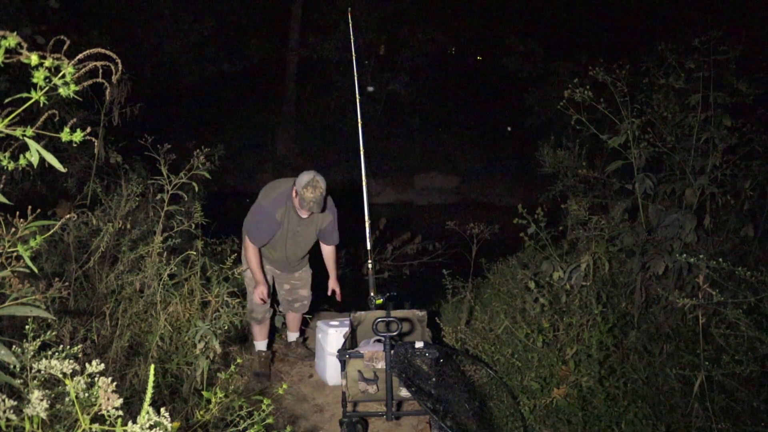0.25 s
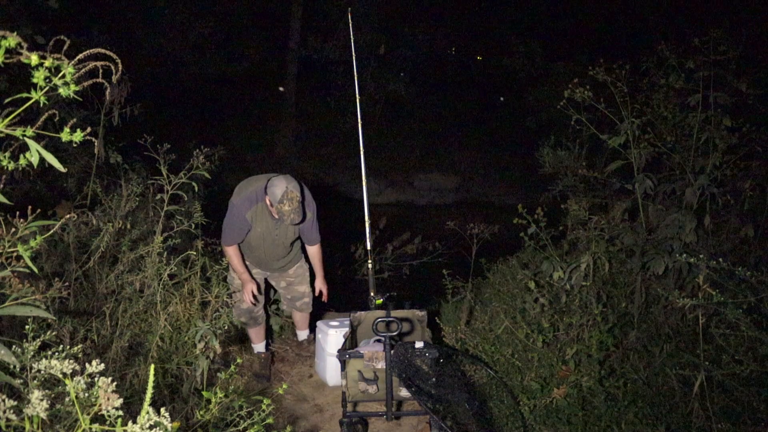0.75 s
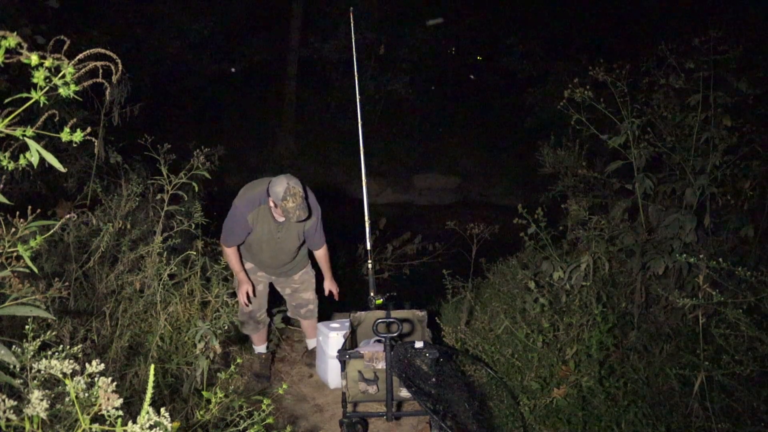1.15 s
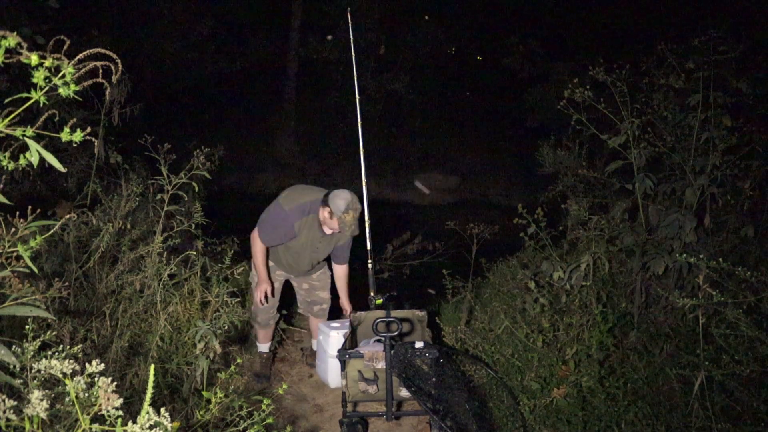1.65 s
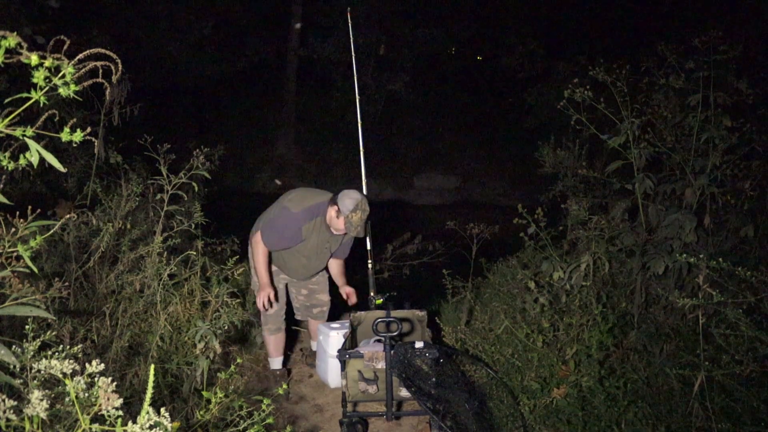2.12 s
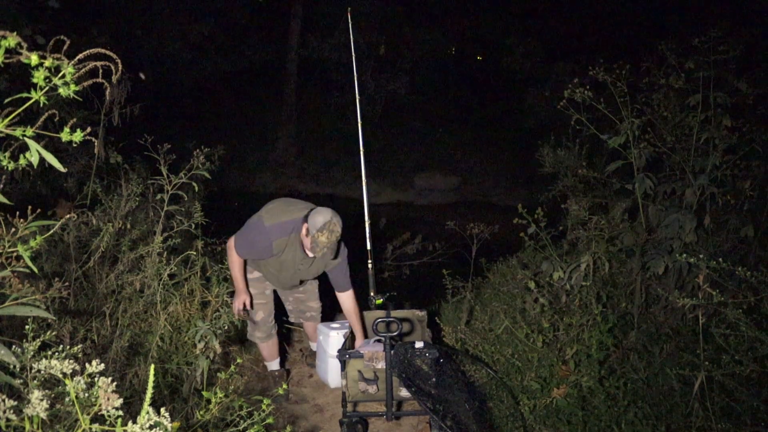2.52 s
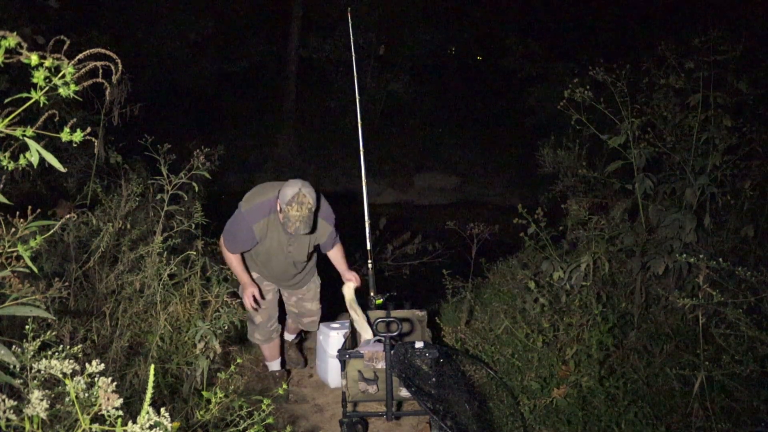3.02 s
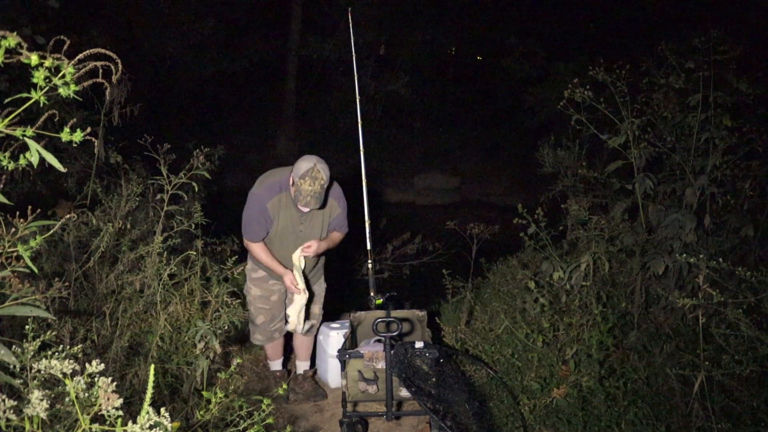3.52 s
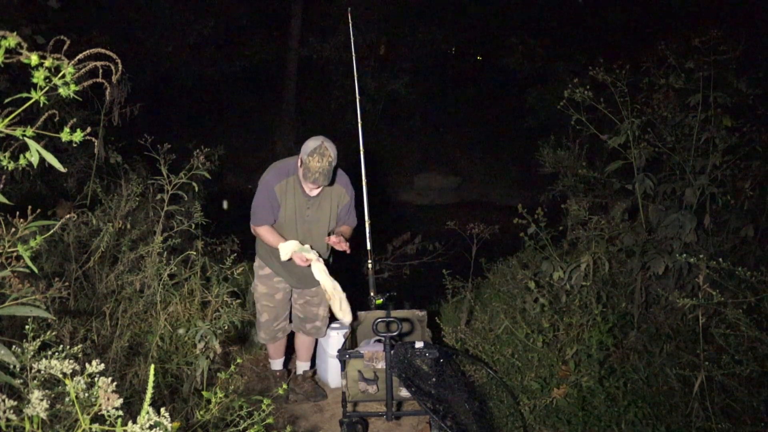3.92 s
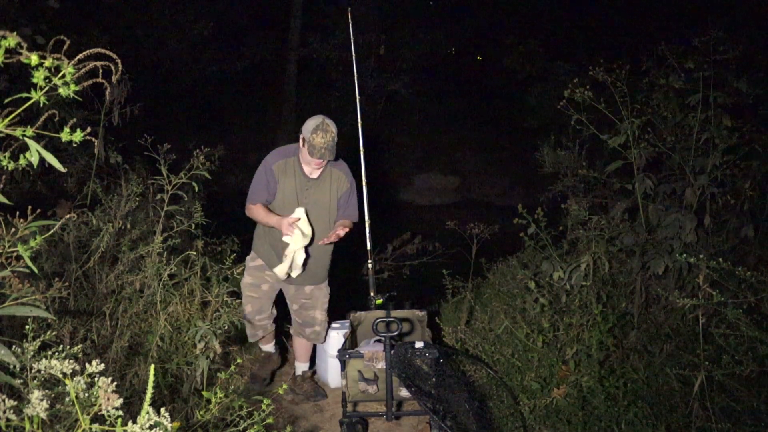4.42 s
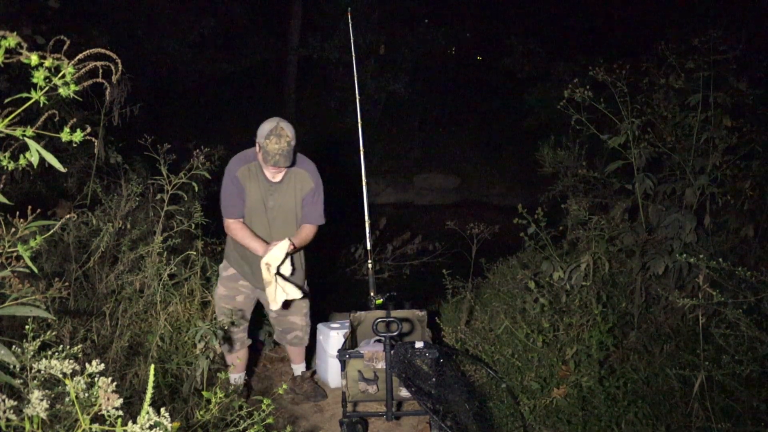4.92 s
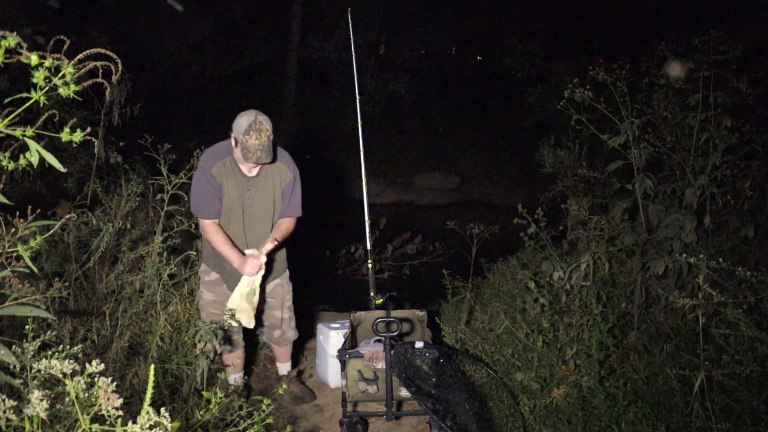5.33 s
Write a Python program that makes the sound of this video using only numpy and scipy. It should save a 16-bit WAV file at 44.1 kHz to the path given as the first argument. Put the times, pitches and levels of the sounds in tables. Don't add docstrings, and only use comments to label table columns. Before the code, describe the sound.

Outdoors at night beside quiet water, continuous high cricket trilling mixes with dry buzzing and rasping katydids that grow stronger towards the end. In the first two seconds a loaded plastic bucket is bumped, giving short, dull, low rings and a bright wire tick. Then come faint taps and rag scrapes, with a small cluster near the end. A single microphone hears it in mono, the handling loudest and the insects fairly quiet.

```python
import sys
import numpy as np
from scipy import signal
from scipy.fft import rfft, irfft
from scipy.io import wavfile
from scipy.ndimage import uniform_filter1d

SR = 44100
rng = np.random.default_rng(int(sys.argv[2]) if len(sys.argv) > 2 else 0)


def linear_from_db(decibels):
    return 10 ** (np.asarray(decibels, float) / 20)


def materialize(psi):
    bounded = np.clip(np.atleast_2d(psi).T, -1, 1)
    quanta = np.round(bounded * 32767).astype(np.int16)
    wavfile.write(sys.argv[1], SR, quanta)


N = 245175
T = np.arange(N) / SR


def level(x, db):
    return x * linear_from_db(db) / np.sqrt(np.mean(x ** 2))


def band(x, hz, width):
    return signal.lfilter(*signal.iirpeak(hz, hz / width, SR), x)


def dull(x, hz, order):
    return signal.sosfilt(signal.butter(order, hz, fs=SR, output="sos"), x)


def thin(x):
    return signal.sosfilt(signal.butter(2, 48, "high", fs=SR, output="sos"), x)


def blur(x, t60, wet):
    t = T[:SR // 5]
    tail = rng.standard_normal(len(t)) * linear_from_db(-60 * t / t60)
    tail = tail / np.sqrt(np.sum(tail ** 2))
    return x + wet * signal.fftconvolve(x, tail)[:len(x)]


def walk(rate):
    k = int(SR / rate)
    steps = np.repeat(rng.standard_normal(N // k + 1), k)
    drift = uniform_filter1d(uniform_filter1d(steps, k), k)[:N]
    return drift / drift.std()


def add(out, x, s):
    i = max(int(s * SR), 0)
    out[i:i + len(x)] += x[:len(out) - i]


def phrase(start, end, swell_s, fade):
    rise = (T - start) / swell_s
    fall = (end - T) / (fade * (end - start))
    return np.sin(np.pi / 2 * np.clip(np.minimum(rise, fall), 0, 1))


def wing(strokes, hz, duty, fall, edge, scatter_db, slip):
    part = np.minimum(strokes % 1 / duty, 1)
    size, start = rng.standard_normal((600, 2))[strokes.astype(int) % 600].T
    ramp = np.clip(np.minimum(part / edge, (1 - part) / (.5 * edge)), 0, 1)
    pitch = hz * (1 + fall * (1 / 3 - part ** 2) * (part < 1))
    tone = np.sin(2 * np.pi * np.cumsum(pitch) / SR + slip * start)
    return linear_from_db(scatter_db * size) * np.sin(np.pi / 2 * ramp) * tone


def calls(rows, hz, rate, duty, fall, swell_s, wet):
    out = np.zeros(N)
    for start, end, db in rows:
        t = np.arange(int((end - start) * SR)) / SR
        wander = 1 + .0015 * walk(8)[:len(t)]
        rise = np.minimum(.5 + t / swell_s, 1)
        swell = np.minimum(rise, .3 + (t[-1] - t) / swell_s)
        slip = 1000 * fall ** 2 + .1
        song = wing(rate * t, hz * wander, duty, fall, edge=.35, scatter_db=2, slip=slip) * swell
        song = np.r_[song, np.zeros(3000)]
        add(out, level(blur(song, 0.085, wet), db), start)
    return out


def teeth(rate_hz, scatter_db):
    hits = rng.random(N) < rate_hz / SR
    return hits * rng.standard_normal(N) * linear_from_db(scatter_db * rng.standard_normal(N))


# (pitch [Hz], level per Hz [dB])
AIR_COLOUR = [(18, -28), (55, -8), (990, -11), (2050, -17.5), (4450, -24), (6200, -7), (9200, -27),
              (16000, -19)]
# (start [s], end [s], extra level [dB])
RUSTLES = [
    (-1, 3.38, 2),
    (5, 7, 2.74),
]


def air():
    out, swell = 0, walk(0.195)
    stir = sum(db * phrase(start, end, 0.67, .12) for start, end, db in RUSTLES)
    f = np.fft.rfftfreq(N, 1 / SR) + 1
    colour_hz, colour_db = np.transpose(AIR_COLOUR)
    colour = linear_from_db(np.interp(np.log(f), np.log(colour_hz), colour_db))
    noise = rfft(rng.standard_normal(N)) * colour
    for hz in 2. ** np.arange(4.5, 14.5, .5):
        share = np.cos(np.pi / 2 * np.clip(2 * np.log2(f / hz), -1, 1)) ** 2
        change_db = .8 * swell + 1.2 * walk(9) + (hz < 2000) * stir
        out = out + irfft(noise * share, N) * linear_from_db(change_db)
    return level(out, -58)


# (time [s], lead over the steady beat [wing strokes])
BEAT_LEAD = [(0, .41), (1.5, .41), (2.3, .305), (3.3, .305), (3.9, .33), (4.25, .388), (4.85, .392),
             (5.56, .36)]


def near_cricket():
    stroke_rate, pitch_hz = 40.1, 6662
    wander = 1 + .0015 * walk(6)
    strokes = stroke_rate * T + np.interp(T, *np.transpose(BEAT_LEAD))
    song = wing(strokes, pitch_hz * wander, duty=.44, fall=.032, edge=.3, scatter_db=1.1, slip=.6)
    return level(blur(song, 0.15, 0.52), -58.5)


# (middle pitch [Hz], pitch spread [Hz], wing rate [strokes/s])
FAR_CHORUSES = [(2975, 85, 52), (2680, 150, 58), (3900, 130, 57), (5740, 170, 65), (5350, 130, 55),
                (6480, 90, 70), (7400, 200, 75), (7930, 90, 62)]
FAR_CHORUS_DB = [-58.5, -62, -69.5, -57, -60, -68, -68.5, -75.5]


def choruses(count=10):
    out = 0
    for (hz, spread_hz, rate), db in zip(FAR_CHORUSES, FAR_CHORUS_DB):
        crowd = 0
        for middle in np.linspace(-1.6, 1.6, count):
            pitch = hz + spread_hz * (middle + .4 * walk(3))
            strokes = rate * (1 + .08 * rng.standard_normal()) * T + rng.random()
            fading = linear_from_db(2.0 * walk(3.9) - 1.73 * middle ** 2)
            crowd = crowd + fading * wing(strokes, pitch, 0.644, 0.031, 0.1, 1.2, 2.84)
        out = out + level(crowd, db)
    return out


# (start [s], end [s], level [dB])
HIGH_BUZZES = [
    (-.1, .38, -74),
    (0.422, 1.21, -69.5),
    (1.19, 1.7, -75),
    (1.756, 2.555, -71.5),
    (2.72, 3.69, -76),
    (3.453, 4.55, -72.5),
    (4.493, 5.03, -68),
    (5.153, 5.9, -68),
]
# (start [s], end [s], level [dB])
ANSWERS = [
    (.45, .95, -76),
    (1.198, 1.62, -74),
    (2.25, 2.56, -76),
    (2.95, 3.3, -74),
]


def buzzing_katydids():
    swell_s, fade = .3, .15
    beat = 2 * np.pi * np.cumsum(32.0 * (1 + 0.0289 * walk(1.5))) / SR
    gate = 1 + 0.039 * np.cos(beat) + 0.085 * np.cos(2 * beat) + 0.22 * np.cos(3 * beat)
    high = band(band(teeth(15000, 1.1) * gate, 13030, 3600), 15700, 5700)
    low = band(band(teeth(15000, 1.1), 11400, 2200), 12300, 2600)
    effort = linear_from_db(-77.5)
    effort = effort + sum(linear_from_db(db) * phrase(start, end, swell_s, fade) for start, end, db in HIGH_BUZZES)
    answer = sum(linear_from_db(db) * phrase(start, end, .5 * swell_s, fade) for start, end, db in ANSWERS)
    return level(high, 0.85) * effort + level(low, 0) * answer


# (start [s], end [s], stroke level [dB], level of the drone between strokes [dB])
RASP_PHRASES = [(-.05, .25, -86, -78), (1.507, 1.65, -83, -92), (.8, 1.12, -80, -82),
                (1.848, 2.0, -78, -78), (2.028, 2.16, -74, -81), (2.18, 2.27, -66, -82),
                (2.793, 2.98, -70, -66), (2.908, 3.6, -82, -57.5), (3.509, 3.64, -80, -86),
                (4.118, 4.617, -66.5, -68.5), (4.637, 4.793, -67, -66), (4.727, 5.245, -77, -59),
                (5.484, 5.8, -65, -69)]
# (pitch [Hz], width [Hz])
WING_AREAS = [(8500, 1900), (9700, 2200), (11500, 3500)]
WING_AREA_DB = [1, -9, -13]


def rasping_katydid():
    stroke_s, uneven, scatter_db = .066, .15, 2.5
    effort = np.full(N, linear_from_db(-85))
    t = T[:SR // 10]
    stress = np.minimum(t / 0.0066, 1) * np.exp(-(t / 0.044) ** 2)
    lucks = rng.standard_normal((len(RASP_PHRASES), 12, 2))
    for (start, end, stroke_db, drone_db), luck in zip(RASP_PHRASES, lucks):
        shape = phrase(start, end, swell_s=.015, fade=.7) ** 2
        strokes = np.zeros(N)
        for k, (late, size) in enumerate(luck):
            varied = k > 0
            when = start + stroke_s * (k + uneven * late * varied)
            add(strokes, linear_from_db(scatter_db * size * varied) * stress, min(when, T[-1]))
        effort += shape * (linear_from_db(drone_db) + linear_from_db(stroke_db) * strokes)
    body = 0
    for (hz, width), db in zip(WING_AREAS, WING_AREA_DB):
        body = body + linear_from_db(db) * band(band(teeth(4000, 2.5), hz, width), hz, width)
    return level(body, 1.6) * effort


# (first stroke [s], end [s], level [dB])
SHORT_TRILLS = [
    [(0, .2, -64), (1.233, 1.5, -63), (2.826, 3.13, -64.5), (4.249, 4.55, -62.5)],
    [(.222, .53, -59), (2.1, 2.36, -60), (3.753, 4.12, -59.5), (4.95, 5.22, -55.5), (5.31, 5.6, -71)],
    [(.666, .95, -57), (1.15, 1.5, -59), (2.768, 3.0, -57.5), (4.236, 4.5, -57), (4.853, 5.16, -57)],
    [(1.298, 1.6, -54), (3.278, 3.62, -55), (4.9, 5.25, -57)],
    [(2.09, 2.3, -63), (3.243, 3.5, -62.5), (4.189, 4.32, -63)],
    [(2.5, 2.66, -70), (3.754, 3.92, -61)],
    [(.956, 1.12, -67), (2.42, 2.58, -66)],
    [(1.24, 1.48, -76), (2.83, 3.07, -73), (4.26, 4.5, -73)],
]
# (pitch [Hz], wing rate [strokes/s], pitch fall [share])
TRILLERS = [(4905, 52.75, .035), (5245, 52.75, .02), (5512, 55.5, .014), (5308, 51.2, .014),
            (5065, 51.4, .03), (5556, 57, .02), (5475, 56, .02), (4560, 60, .12)]
# (first stroke [s], end [s], level [dB])
FIELD_CHIRPS = [
    (.564, .668, -67.5),
    (.891, .998, -66),
    (1.02, 1.04, -70),
    (1.248, 1.29, -68),
    (1.311, 1.353, -65),
]
# (first stroke [s], end [s], level [dB])
HIGH_SONG = [
    (.016, 2.24, -72),
]


def trilling_crickets():
    trills = 0
    for rows, (hz, rate, fall) in zip(SHORT_TRILLS, TRILLERS):
        trills = trills + calls(rows, hz, rate, duty=.76, fall=fall, swell_s=.05, wet=.55)
    chirps = calls(FIELD_CHIRPS, 3960, 47, duty=.55, fall=.1, swell_s=.03, wet=.35)
    high = calls(HIGH_SONG, 8100, 51.85, duty=.55, fall=.02, swell_s=.03, wet=.3)
    return trills + chirps + high


# (time [s], peak level [dB], loudest ring [Hz], crack level [dB], rise [s])
BUCKET_KNOCKS = [(0, -38, 207, -54, 0.0022), (0.206, -12.5, 246, -28.5, 0.0053),
                 (0.967, -36.5, 119, -62, 0.0018), (0.994, -47, 96, -51, 0.012),
                 (1.136, -46, 144, -53, 0.017), (1.1669, -24.5, 315, -36, 0.0086),
                 (1.219, -40, 130, -58, 0.0043), (1.299, -37.5, 358, -59, 0.0083),
                 (1.334, -50, 120, -72, 0.0096), (1.376, -55, 111, -70, 0.0095),
                 (1.4535, -44, 230, -67, 0.0026), (1.491, -49, 257, -71, 0.0058),
                 (1.739, -48.5, 92.5, -70, 0.009), (1.836, -38, 300, -55, 0.0061),
                 (1.8481, -18.5, 166, -32.5, 0.0017), (1.8643, -24.5, 357, -41, 0.0024),
                 (1.886, -33, 294, -62, .005), (1.957, -48.5, 278, -65, 0.0034),
                 (2.879, -56.5, 86, -70, 0.025)]
# (pitch [Hz], level [dB], time to die by 60 dB [s])
WALL_MODES = [(110.6, -2, 0.36), (149.3, 4.5, 0.18), (211, -9.5, 0.35), (266.2, -5, 0.33), (294, -3, 0.21),
              (458, -5.5, 0.19), (561.5, 3, 0.084), (767, 1, 0.045), (842, 4, 0.023), (966, -18, 0.076),
              (1310, -33, 0.049), (1550, -26, 0.035)]


def bucket():
    out, t = np.zeros(N), T[:SR // 2]
    hz, mode_db, t60 = np.transpose(WALL_MODES)[:, :, None]
    ring_share = 0.69
    lucks = rng.standard_normal((len(BUCKET_KNOCKS), len(WALL_MODES), 4))
    for (s, db, ring_hz, crack_db, rise), luck in zip(BUCKET_KNOCKS, lucks):
        onset = np.minimum(t / rise, 1)
        gain = linear_from_db(mode_db + 3.6 * luck[:, :1] - 4.8 * np.abs(np.log2(hz / ring_hz)))
        first = np.sin(2 * np.pi * hz * (1 + 0.0063 * luck[:, 1:2]) * t)
        second = np.sin(2 * np.pi * hz * (1 + 0.098 * luck[:, 2:3]) * t + 3 * luck[:, 3:])
        walls = np.sum(gain * linear_from_db(-60 * t / (ring_share * t60)) * (first + 0.66 * second), axis=0)
        thump_fade = linear_from_db(-60 * np.maximum(t - rise, 0) / 0.047)
        thump = 1.23 * gain.max() * thump_fade * np.sin(2 * np.pi * ring_hz * t)
        body = -(walls + thump) * np.sin(np.pi / 2 * onset) ** 2
        noise = rng.standard_normal((3, len(t)))
        thud_hz, thud_width = 0.34 * ring_hz, 2.2 * ring_hz
        thud = band(band(noise[2], thud_hz, thud_width), thud_hz, thud_width)
        thud = thud * linear_from_db(-60 * t / 0.078) * onset
        body = body / np.abs(body).max() + 0.4 * thud / np.abs(thud).max()
        crack = dull(band(noise[0], 1850, 1800), 3580, order=3) * linear_from_db(-60 * t / 0.027)
        rattle = band(band(noise[1], 560, 570), 630, 760) * linear_from_db(-60 * t / 0.036)
        knock = linear_from_db(db) * body / np.abs(body).max()
        add(out, knock + linear_from_db(crack_db + 11.5) * crack + linear_from_db(.5 * db - 14.5) * rattle, s)
    return out


# (time [s], peak level [dB])
WIRE_TICKS = [
    (0.207, -26),
    (1.167, -32.5),
]


def handle():
    out, t = np.zeros(N), T[:SR // 50]
    for s, db in WIRE_TICKS:
        noise = rng.standard_normal(len(t))
        tick = band(band(noise, 5000, 4600), 5000, 4600) * linear_from_db(-60 * t / 0.0088)
        add(out, linear_from_db(db) * tick / np.abs(tick).max(), s)
    return out


# (time [s], peak level [dB], pitch [Hz], length [s], bright share [dB])
RAG_TAPS = [(0.988, -62, 458, 0.038, -14), (1.269, -41.5, 2150, 0.022, -14), (2.148, -46, 1650, 0.099, -20),
            (2.177, -44, 825, 0.03, -7), (2.299, -49, 735, 0.024, -14), (2.647, -53, 587, 0.026, -7),
            (2.764, -46.5, 1160, 0.04, -14), (2.825, -47, 681, 0.045, -16), (2.9, -46, 960, 0.019, -14),
            (3.044, -50.5, 434, 0.044, -22), (3.223, -59, 466, 0.03, -2), (3.458, -47.5, 595, 0.044, -29),
            (4.682, -44, 1640, 0.03, -14), (4.745, -50, 2500, 0.077, -4), (4.773, -43, 2600, 0.034, -4),
            (4.774, -44.5, 1800, 0.065, -14), (4.796, -46, 2300, 0.028, -4), (4.833, -41, 530, 0.0086, -25)]


def taps():
    out, t = np.zeros(N), T[:SR // 8]
    for s, db, hz, length, bright_db in RAG_TAPS:
        scrape = rng.standard_normal(len(t)) * np.minimum(t / 0.008, 1) * linear_from_db(-30 * t / length)
        tap = band(band(scrape, hz, hz), hz, 2.5 * hz)
        bright = dull(band(scrape, 3000, 4000), 6200, order=2)
        add(out, linear_from_db(db - 4) * (tap / np.abs(tap).max() + linear_from_db(bright_db) * bright), s)
    return out


def scene():
    crickets = near_cricket() + choruses() + trilling_crickets()
    katydids = buzzing_katydids() + rasping_katydid()
    handling = blur(thin(bucket()) + handle() + taps(), 0.15, .2)
    mono = air() + crickets + katydids + handling
    return np.array([mono, mono])


def roll_off(x):
    return signal.sosfilt(signal.butter(12, 16810, fs=SR, output="sos"), x)


def record(dry):
    narrow = signal.sosfilt(signal.ellip(10, .2, 70, 15750, fs=SR, output="sos"), dry)
    return roll_off(narrow)


dry = scene()
out = record(dry)
materialize(out)
```